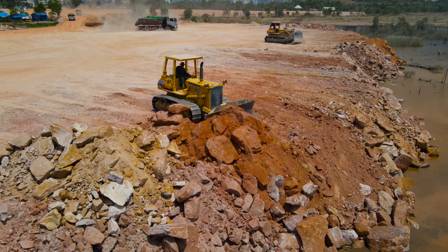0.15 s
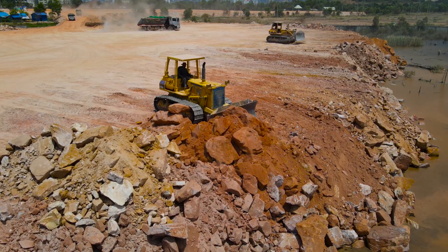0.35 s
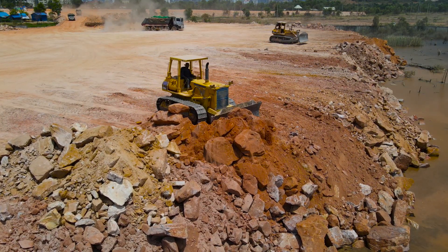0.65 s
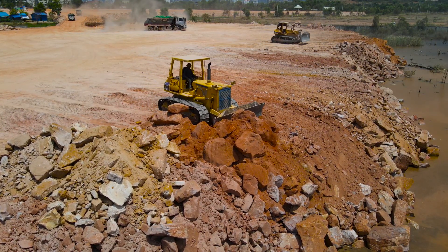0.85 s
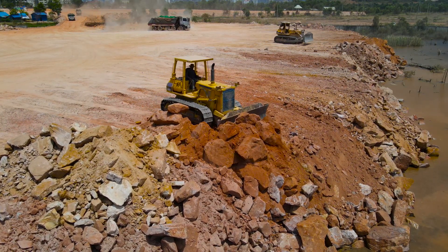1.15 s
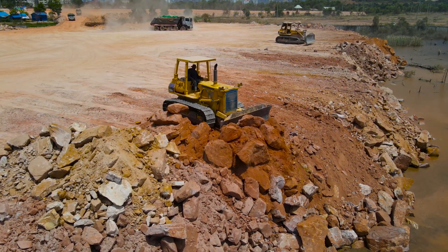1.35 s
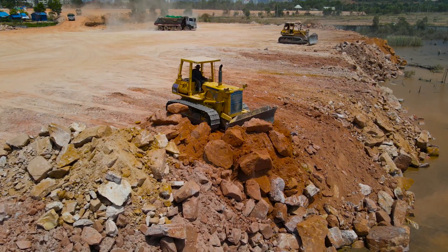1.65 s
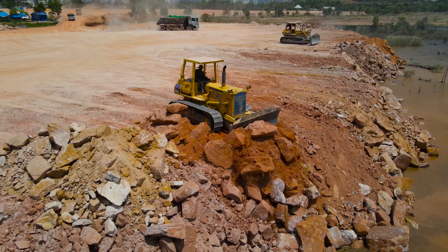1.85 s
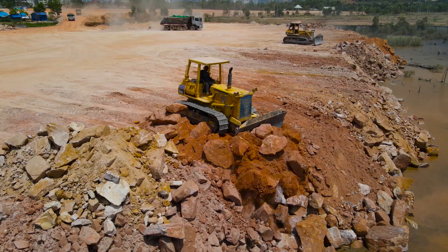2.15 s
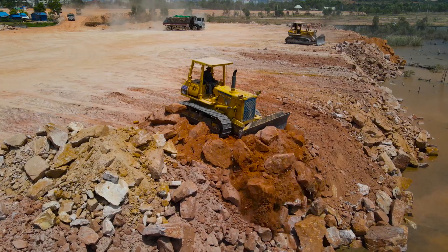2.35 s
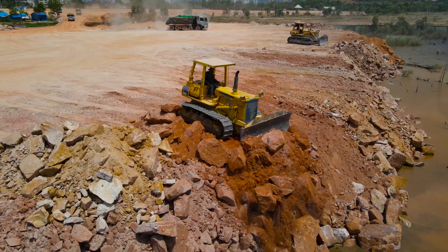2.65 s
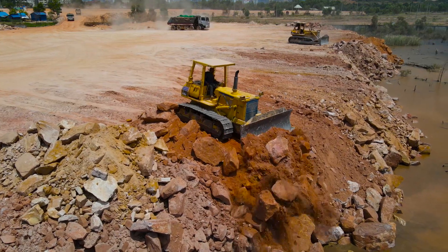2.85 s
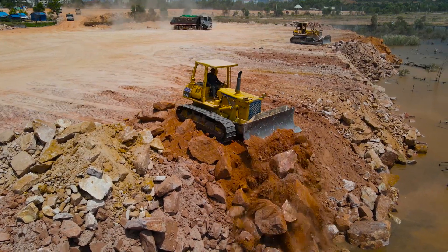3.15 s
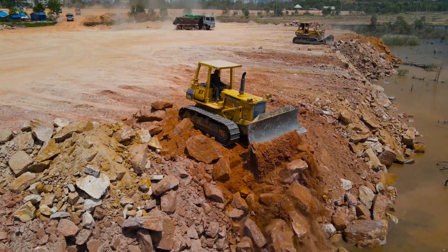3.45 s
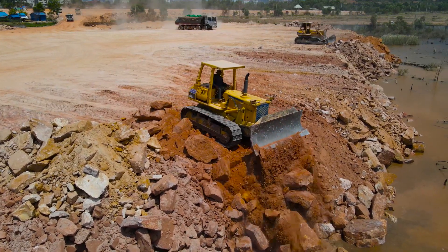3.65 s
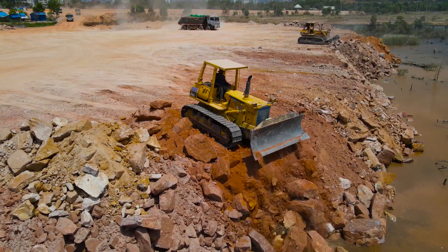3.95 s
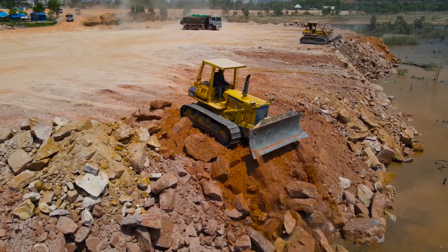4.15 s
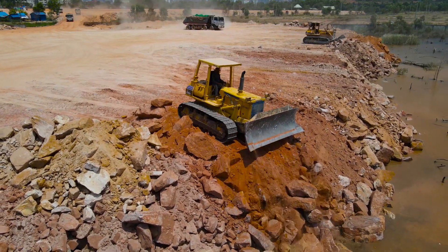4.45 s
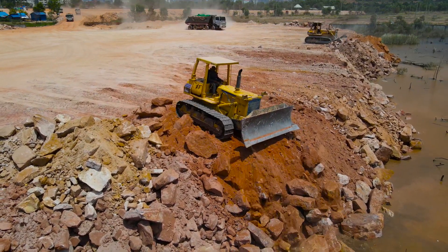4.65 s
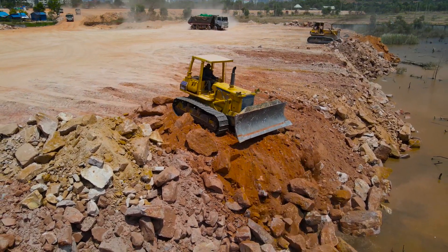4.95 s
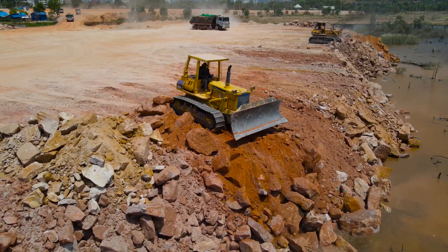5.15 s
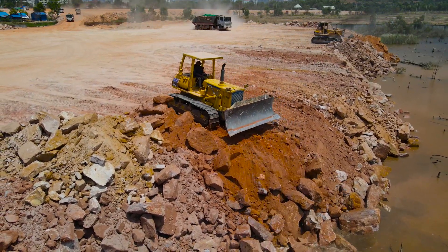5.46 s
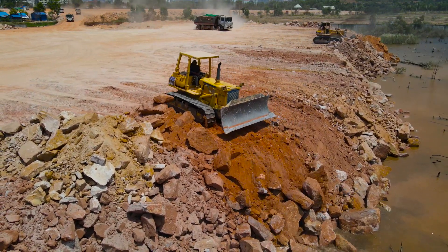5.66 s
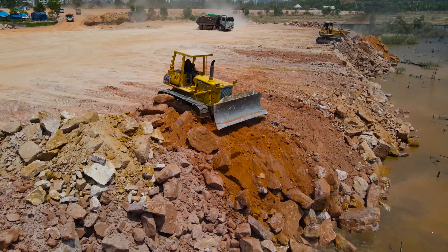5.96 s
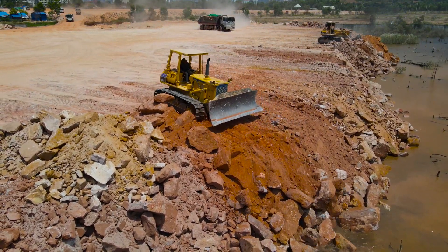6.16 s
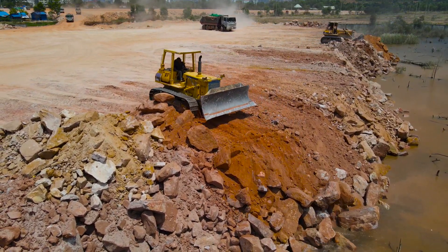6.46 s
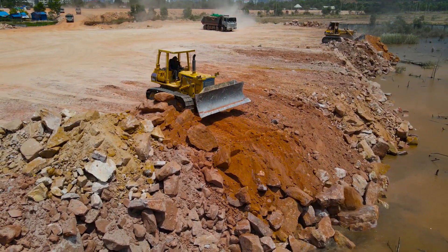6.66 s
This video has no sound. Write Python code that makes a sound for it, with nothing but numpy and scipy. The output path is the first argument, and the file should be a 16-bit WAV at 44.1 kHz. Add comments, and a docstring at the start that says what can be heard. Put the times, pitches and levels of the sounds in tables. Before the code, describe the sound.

Outdoors and close, a bulldozer's six-cylinder diesel booms fast and uneven under a broad roar, with ringing block knock and loose steel rattle. One hard knock comes early. Midway the boom cuts out briefly, engine speed sags, then climbs with gear whine as the machine backs away. Track clanks, squeaks and groans cluster near the end, amid two more quick power drops. Stereo from two close microphone ports.

```python
"""A six-cylinder diesel booms first: a tracked earthmover pushes rock, lifts off the fuel, reverses, pulls again.
The exhaust sounds on the firing rate over weaker crank orders and fan tones; firings knock the block into ringing
and shaped noise makes a broad roar. Gear whine and engine harmonics are sines locked to engine speed; ticks
rattle, pins squeak, noise bursts ring steel as one hard engine knock and link clanks, and short notes glide as
groans. Heard outdoors in stereo by two close microphone ports."""
import sys
import numpy as np
from scipy import signal
from scipy.fft import rfft, irfft, next_fast_len
from scipy.io import wavfile

SR = 44100
rng = np.random.default_rng(int(sys.argv[2]) if len(sys.argv) > 2 else 0)


def attenuation_scalar(level_db):
    """Turn a level in dB into a linear amplitude multiplier (20 dB per decade)."""
    decades = np.asarray(level_db, float) / 20
    return 10 ** decades


def persist_wave(psi):
    """Save psi, clipped to +-1, as 16-bit WAV."""
    counts = np.round(np.clip(psi, -1, 1) * 32767).astype(np.int16)
    wavfile.write(sys.argv[1], SR, np.atleast_2d(counts).T)


N = 300321   # samples, about 6.81 s

# relative strength of each firing in the six-firing cycle: strength_db
FIRING_STRENGTHS = [6, 0, 2.5, 1.5, 4, 4]
# stereo set by pitch: pitch_hz, left_lead_rad, left_minus_right_db, likeness (0-1)
STEREO = [(30, .1, 0, .55), (90, .1, .1, .85), (140, .05, .2, .68), (250, .05, .4, .96),
          (450, .06, .5, .96), (900, .4, 1.5, .9), (1500, .9, -2.5, .8), (2100, 1.9, -8, .7),
          (2700, 3.4, -4, .8), (3400, 6.0, 9, .6), (4000, 8.2, 5, .7), (4350, 9.3, .3, .91),
          (5500, 9.6, .6, .91), (5850, 12.4, 0, .82), (8900, 12.6, 0, .9), (9600, 15.7, 0, .999),
          (10850, 15.72, 0, .999), (11200, 18.4, 0, .9)]


def rms_one(x):
    """Scale to unit power."""
    return x / np.sqrt(np.mean(x ** 2) + 1e-20)


def in_time(rows):
    """One curve per column, sample by sample."""
    s, *columns = np.transpose(rows)
    return [np.interp(np.arange(N) / SR, s, c) for c in columns]


def at_hz(points, hz, column=1):
    """Read a table column on a log-frequency axis."""
    table = np.array(points)
    return np.interp(np.log(hz + 1e-9), np.log(table[:, 0]), table[:, column])


def drift(rate_hz):
    """Slow chance of spread 1: sparse noise through a double one-pole low-pass."""
    every = 40   # samples between sparse points
    settling = 2000
    r = np.exp(-2 * np.pi * rate_hz * every / SR)
    noise = rng.standard_normal(N // every + 2 + settling)
    slow = signal.lfilter([1], [1, -2 * r, r * r], noise)[settling:]
    return np.interp(np.arange(N) / every, np.arange(len(slow)), rms_one(slow))


def ring(x, hz, t60):
    """A damped resonance: a unit click sets a sine of height 1 ringing, down 60 dB after t60 seconds."""
    r = attenuation_scalar(-60 / (t60 * SR))
    w = 2 * np.pi * hz / SR
    return signal.lfilter([0, np.sin(w)], [1, -2 * r * np.cos(w), r * r], x + 1e-18)


def tone(cycles, db, waver_db):
    """A sine of given rms level on a running phase, its level and phase wandering."""
    wander_rad = .1 * waver_db * drift(3)
    height = np.sqrt(2) * attenuation_scalar(db + waver_db * drift(5))
    return height * np.sin(2 * np.pi * cycles + wander_rad)


def glides(rows):
    """Short notes that slide from a first to a last pitch."""
    out = np.zeros(N)
    for start, length, first_hz, last_hz, peak_db in rows:
        at, size = round(start * SR), round(length * SR)
        cycles = np.cumsum(np.linspace(first_hz, last_hz, size)) / SR
        note = attenuation_scalar(peak_db) * np.hanning(size) ** 0.27 * np.sin(2 * np.pi * cycles)
        out[at:at + size] += note[:N - at]
    return out


def fuel_loss():
    """Boom lost (dB) when the fuel is cut, then returns at once in part and creeps up to full, and when it is eased."""
    # the fuel is cut and comes back: cut_s, back_s, boom_lost_db, short_on_return_db, creep_s (time constant)
    fuel_cuts = [(2.892, 3.085, 30, 12, .33), (5.93, 6.128, 19, 5, .2), (6.688, 6.9, 22, 5, .1)]
    # fuel eased under the heaviest push and before the last cut: start_s, end_s, boom_lost_db
    eased = [(2.408, 2.9, 1.4), (6.545, 6.72, 3.5)]
    cut_fade_s, return_fade_s = 0.085, 0.017
    t = np.arange(N) / SR
    lost = 0
    for cut, back, lost_db, short_db, creep_s in fuel_cuts:
        gone = np.clip((t - cut) / cut_fade_s, 0, 1)
        returned = np.clip((t - back) / return_fade_s, 0, 1)
        short = short_db * np.exp(-np.maximum(t - back, 0) / creep_s)
        lost = lost + gone * ((1 - returned) * lost_db + returned * short)
    for start, end, lost_db in eased:
        lost = lost + lost_db * np.clip(np.minimum(t - start, end - t) / cut_fade_s, 0, 1)
    return lost


def exhaust(fired, per_s, rumble_db, lost_db):
    """The stack booms on the firing rate; uneven cylinders add crank orders, the belt-driven fan its blade tone."""
    # uneven cylinders: multiples of the six-firing cycle rate
    crank_orders = [4, 5, 7, 8, 9, 10, 11, 14, 15, 18, 20, 24, 48, 54]
    # rms level of each order at usual speed on full fuel: level_db
    crank_levels = [-41, -39, -42, -34.5, -40, -34.5, -47, -41.5, -41, -42, -47.5, -39, -50, -43]
    # a labouring engine shakes on some low orders: rise_db of each order at the slow speed below
    labour_rises = [3, -4, -3.5, 7, -4, 9, 16, -3, 7, 3, 8, 1, -10, -7]
    # fan blade tone and its octave, before the load swing: level_db
    fan_levels = [-36.5, -42.5]
    usual_per_s, slow_per_s = 86, 63   # firings per second
    fan_per_firing = 2.37
    boom_db = -13 - lost_db
    # a pipe resonance at 126 Hz lifts the second harmonic at low speed, by up to 17.5 dB
    pipe_db = 17.5 / (1 + ((2 * per_s - 126) / 15.3) ** 2)
    second_db = -38.5 + pipe_db - 0.95 * lost_db
    out = tone(fired, boom_db, waver_db=.5) + tone(2 * fired, second_db, waver_db=1.5)
    labour = (np.maximum(usual_per_s - per_s, 0) / (usual_per_s - slow_per_s)) ** 2
    load_db = .5 * (rumble_db - rumble_db.mean())
    for order, db, rise_db in zip(crank_orders, crank_levels, labour_rises):
        cycles = fired * order / len(FIRING_STRENGTHS) + rng.random()
        # crank orders feel only a share of the fuel loss
        out += tone(cycles, db + rise_db * labour - 0.26 * lost_db, waver_db=2.0)
    for k, db in enumerate(fan_levels):
        out += tone((k + 1) * fan_per_firing * fired, db + load_db, waver_db=1.8)
    return out


def knock(fired, knock_db):
    """Each firing raps the block a little early or late and sets its resonances ringing."""
    # block resonances: pitch_hz, width_hz, relative_db, change_db (once backing away)
    block = [(606, 56, 5.5, 7), (645, 32, -2.5, 12.5), (730, 57, 1, 6), (780, 13.5, -1, 4),
             (852.6, 16.3, -1, 5), (926, 24, -6, 7), (1248, 26, -2, 7), (1590, 42, -11, 3)]
    backing_s, backing_fade_s = 4.64, 1   # the machine backs away and shows another side
    at = np.flatnonzero(np.diff(np.floor(fired + 0.1927)))
    chance = rng.standard_normal((len(at), 2))
    raps = np.zeros(N)
    shift = np.round(0.0006 * SR * chance[:, 0]).astype(int)   # spread 0.6 ms
    rap_db = np.resize(FIRING_STRENGTHS, len(at)) + 2.0 * chance[:, 1]
    raps[np.clip(at + shift, 0, N - 1)] = attenuation_scalar(rap_db)
    turned = np.clip((np.arange(N) / SR - backing_s) / backing_fade_s, 0, 1)
    rung = 0
    for k, (hz, width_hz, db, change_db) in enumerate(block):
        gain = attenuation_scalar(db + turned * change_db + 2.5 * drift(4))
        rung = rung + gain * (-1) ** k * ring(raps, hz, 2.2 / width_hz)
    return attenuation_scalar(knock_db - 6.0) * rms_one(rung)


def roar(fired, rumble_db, block_db, hiss_db):
    """Intake, fan air, valve gear and gravel blur into patchy noise that throbs a little with the firings."""
    # colour of the noise, relative since the whole is levelled afterwards: pitch_hz, level_db (per Hz)
    roar_colour = [(25, -10.5), (60, 0.5), (130, -0.5), (250, -3), (400, -2.5), (480, -8), (620, -3.5),
                   (790, 0.5), (950, -6), (1100, -10.5), (1500, -7.5), (1850, -12.5), (2500, -11.5),
                   (3600, -27.5), (4400, -16.5), (5300, -11.5), (5800, -18.5), (6250, -17), (6700, -23.5),
                   (7300, -22.5), (8800, -24.5), (10200, -15.5), (11000, -21), (11350, -26), (11700, -67)]
    corners_hz = 22 * 2 ** np.arange(0, 9.4, 1 / 3)   # third-octave bands
    size = next_fast_len(N)
    hz = np.arange(size // 2 + 1) * SR / size
    alike = np.clip(at_hz(STEREO, hz, column=3), 0, 1)
    mid, side = rfft(rng.standard_normal((2, 2, size))) * attenuation_scalar(at_hz(roar_colour, hz))
    shared, own = mid * np.sqrt(1 + alike), side * np.sqrt(1 - alike)
    # two independent noises, so that neighbouring bands take turns
    coloured = irfft(np.stack([shared + own, shared - own], axis=1), size)[..., :N]
    together, flutter = drift(1.6), drift(30)
    throb_db = 1.8 * np.cos(2 * np.pi * fired)
    swell_db = [db - db.mean() for db in (rumble_db, block_db, hiss_db)]
    patch_spread_db = [.8, 1.2, 1.1]
    motion_db = [0, throb_db, 0.89 * flutter]
    out = 0
    for k, (low, high) in enumerate(zip(corners_hz, corners_hz[1:])):
        band_filter = signal.butter(2, [low, high], "band", fs=SR, output="sos")
        band = signal.sosfilt(band_filter, coloured[k % 2])
        group = int(low > 430) + int(low > 2100)   # rumble, roar, treble hiss
        patch_db = 0.23 * together + patch_spread_db[group] * drift(17.0) + motion_db[group]
        out = out + attenuation_scalar(swell_db[group] + patch_db) * band
    return attenuation_scalar(-22.5) * rms_one(out)


def rattle(swell_db):
    """Loose pins and plates: clumped random ticks set small steel parts of many pitches ringing, swelling softly."""
    median_per_s = 130
    sizes = attenuation_scalar(3.8 * np.minimum(rng.exponential(1, N), 3)) * rng.choice([-1, 1], N)
    born = rng.random(N) < median_per_s * attenuation_scalar(4.0 * drift(5)) / SR
    pitches_hz = np.geomspace(950, 4200, 24)
    dealt = rng.integers(0, 24, N)
    rings = 0
    for k, hz in enumerate(pitches_hz):
        ticks = sizes * born * (dealt == k)
        # a second, shorter resonance softens the onset; t60 is 160 and 25 cycles
        rung = ring(ring(ticks, hz, 160 / hz), hz, 25 / hz) / (SR / hz)
        rings = rings + rung * (1000 / hz) ** 0.87
    return attenuation_scalar(-42 + swell_db) * rms_one(rings)


def squeaks():
    """Dry track pins stick and slip: notes whose pitch scatters quickly; wide scatter makes a scrape."""
    # start_s, length_s, pitch_hz, peak_db, pitch_scatter_hz
    squeak_notes = [(.056, .017, 7887, -31, 30), (.073, .016, 7887, -30, 30), (.097, .012, 7897, -35, 30),
                    (5.833, .03, 4020, -29, 260), (6.43, .08, 1860, -35, 8), (6.54, .12, 1860, -34, 8),
                    (6.462, .027, 6140, -28, 40), (6.492, .02, 6160, -31, 40), (6.692, .03, 5702, -24, 15),
                    (6.726, .021, 5706, -24, 15), (6.76, .03, 5602, -28, 15)]
    out = np.zeros(N)
    low_pass = signal.butter(2, 250, fs=SR, output="sos")
    scatter = rms_one(signal.sosfilt(low_pass, rng.standard_normal(N)))
    for start, length, hz, peak_db, scatter_hz in squeak_notes:
        at, size = round(start * SR), round(length * SR)
        cycles = np.cumsum(hz + scatter_hz * scatter[at:at + size]) / SR
        out[at:at + size] += attenuation_scalar(peak_db) * np.sqrt(np.hanning(size)) * np.sin(2 * np.pi * cycles)
    return out


def speed_locked_lines(fired):
    """Sines locked to engine speed fade in and out: gear whine, the ninth firing harmonic, the fan's octave."""
    # lines locked to engine speed: start_s, end_s, cycles_per_firing, level_db (rms);
    # near 9.0 the ninth firing harmonic (about 780 Hz), at 4.75 the fan tone's octave (about 410 Hz),
    # which stands out briefly; the others gear whine
    line_notes = [(.62, 1.47, 12.66, -40), (3.95, 4.62, 12.2, -35.5), (4.3, 4.95, 20.3, -41),
                  (.45, 1.95, 9.0, -34), (.75, 1.15, 4.75, -36), (4.45, 4.72, 9.0, -28),
                  (4.8, 5.18, 8.95, -28.5), (4.25, 4.5, 7.8, -30), (4.58, 4.88, 7.8, -29)]
    t = np.arange(N) / SR
    out = 0
    for start, end, ratio, db in line_notes:
        present = np.clip(np.minimum(t - start, end - t) / .12, 0, 1)
        cycles = ratio * fired + .03 * drift(14)
        out = out + present * tone(cycles, db, waver_db=1.0)
    return out


def short_hits():
    """A short grating noise burst is heard itself and rings a set of modes, each mode's strength drawn anew."""
    # one hard engine knock near 800 Hz (1.2005 s), then clanks of track links:
    # time_s, peak_db, pitch_struck_best_hz, fall_db (per octave away from it), grating_s (decay constant)
    hits = [(1.2005, -13, 800, 14, .002), (3.096, -20, 1500, 2, .02), (3.1211, -18, 1200, 3, .02),
            (3.9764, -12, 800, 8, .018), (4.1954, -21, 1000, 4, .02), (4.9324, -15, 720, 12, .02),
            (5.651, -17, 1500, 2, .02), (6.069, -22, 1500, 1.5, .02), (6.2732, -19, 3000, 2.5, .02),
            (6.3785, -9, 2800, 1.5, .011), (6.488, -14, 720, 13, .02), (6.539, -16, 1500, 12, .01),
            (6.616, -10, 1150, 16, .014)]
    # modes that ring: pitch_hz, relative_db, t60_s
    modes = [(720, 7, 0.06), (930, 1, 0.05), (1280, -8, 0.08), (1500, 10, 0.075), (1690, 7, 0.075),
             (2170, 5, 0.08), (2780, 10, 0.05), (3420, 8, 0.07), (4100, 0, 0.03), (5830, 0, 0.05)]
    t = np.arange(round(.08 * SR)) / SR
    extras_db = 2.0 * rng.standard_normal((len(hits), len(modes)))
    out = np.zeros(N)
    for (s, peak_db, best_hz, fall_db, grate_s), mode_extras_db in zip(hits, extras_db):
        burst = np.zeros(SR // 4)
        envelope = np.exp(-t / grate_s) * np.minimum(t / (0.19 * grate_s), 1)
        burst[:len(t)] = rng.standard_normal(len(t)) * envelope
        rung = 0
        for (hz, level_db, t60), extra_db in zip(modes, mode_extras_db):
            gain = attenuation_scalar(level_db - fall_db * abs(np.log2(hz / best_hz)))
            grating = .6 * ring(burst, hz, .006)
            rung = rung + gain * (attenuation_scalar(extra_db) * ring(burst, hz, t60) + grating)
        at = round(s * SR)
        out[at:at + len(rung)] += (attenuation_scalar(peak_db) * rung / abs(rung).max())[:N - at]
    return out


def gliding_notes():
    """Short gliding sines: groans, and an engine harmonic near 350 Hz rising with speed."""
    # start_s, length_s, first_hz, last_hz, peak_db
    short_notes = [(2.55, 0.35, 792, 784, -27.5), (2.62, 0.23, 396, 402, -29.5),
                   (3.04, 0.18, 1590, 1480, -34), (5.2, 0.14, 350, 359.5, -25), (5.3, 0.38, 810, 833, -41),
                   (5.62, 0.22, 570, 606, -29.5), (5.72, 0.18, 680, 694, -32),
                   (5.92, 0.28, 612, 645, -28.5)]
    return glides(short_notes)


def hum():
    """A low gliding hum while the fuel is cut."""
    # start_s, length_s, first_hz, last_hz, peak_db
    hum_notes = [(2.94, 0.16, 103, 98, -21.5), (6.0, 0.064, 89, 92, -17), (6.74, 0.046, 94, 95, -19)]
    return glides(hum_notes)


def scene():
    """Engine, tracks and roar, mixed ahead of the stereo placing."""
    # engine speed: time_s, firings_per_s
    speed = [(0, 91.0), (0.5, 88.5), (0.65, 86.9), (1.2, 86.6), (1.8, 85.9), (2.35, 86.3), (2.58, 84.0),
             (2.86, 84.0), (3.15, 68.2), (3.33, 62.5), (3.44, 62.9), (3.7, 70.8), (4.0, 77.1), (4.4, 81.9),
             (5.0, 86.0), (5.85, 91.4), (5.93, 91.1), (6.16, 78.0), (6.32, 78.7), (6.43, 82.5), (6.7, 83.8),
             (6.81, 82.0)]
    # effort: time_s, rumble_db, roar_db, hiss_db (these three count only as swings about their means),
    # knock_db (relative: knock() sets its own offset)
    effort = [(0, -30, -31.5, -40.5, -23), (0.3, -36.5, -32.5, -40.5, -24), (1.0, -31, -32.5, -40, -34),
              (1.35, -34, -32.5, -40.5, -22), (2.0, -33, -32.5, -38.5, -27),
              (2.45, -34, -32.5, -40.5, -21.5), (2.75, -32.5, -31.5, -40.5, -21),
              (3.0, -32.5, -35, -42.5, -23.5), (3.35, -37, -34.5, -44.5, -29.5),
              (3.75, -32.5, -34.5, -40, -23.5), (4.3, -30.5, -31, -38, -20.5),
              (4.75, -29.5, -30, -37.5, -21.5), (5.3, -30, -30.5, -38.5, -26),
              (5.75, -29, -29.5, -38, -27.5), (6.1, -29, -31, -42, -28), (6.47, -28.5, -29.5, -36.5, -28),
              (6.81, -28.5, -30.5, -41, -31)]
    per_s, = in_time(speed)
    rumble_db, block_db, hiss_db, knock_db = in_time(effort)
    lost_db = fuel_loss()
    fired = np.cumsum(per_s) / SR   # running count of firings
    steady = exhaust(fired, per_s, rumble_db, lost_db) + knock(fired, knock_db)
    steady = steady + roar(fired, rumble_db, block_db, hiss_db)
    steel = rattle(block_db - block_db.mean()) + squeaks()
    passing = speed_locked_lines(fired) + short_hits() + gliding_notes() + hum()
    return steady + steel + passing


def band_limit(x):
    """A steep low-pass at the top of the band."""
    return signal.sosfilt(signal.butter(12, 11620, fs=SR, output="sos"), x)


def record(dry):
    """Stereo: the left leads, with phase and level set by pitch."""
    size = next_fast_len(N + 2048)
    hz = np.arange(size // 2 + 1) * SR / size
    # half the difference goes to the left, its inverse to the right
    half_level = np.sqrt(attenuation_scalar(at_hz(STEREO, hz, column=2)))
    half = half_level * np.exp(.5j * at_hz(STEREO, hz))
    ports = irfft(rfft(dry, size) * [half, 1 / half], size)[:, :N]
    return band_limit(ports)


dry = scene()
out = record(dry)
persist_wave(out)
```